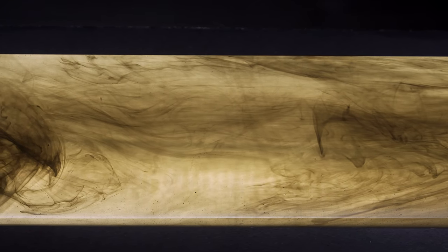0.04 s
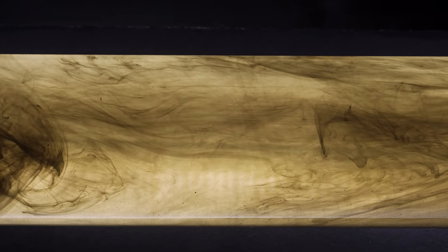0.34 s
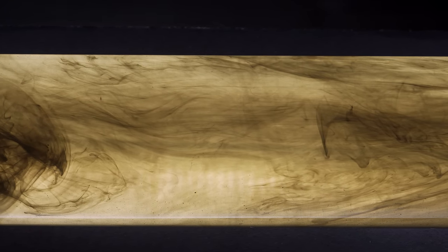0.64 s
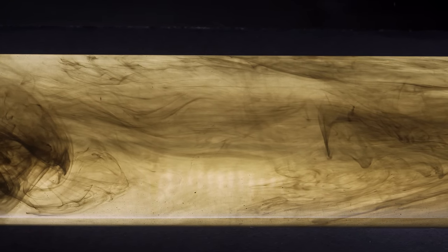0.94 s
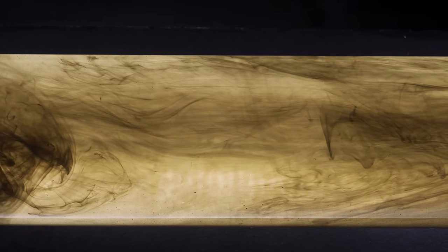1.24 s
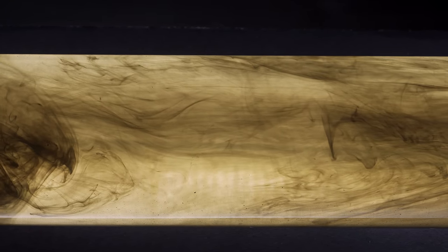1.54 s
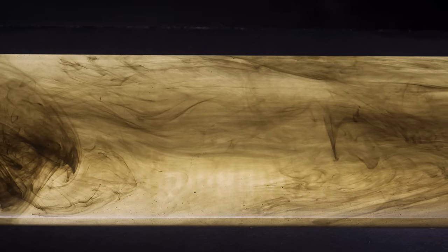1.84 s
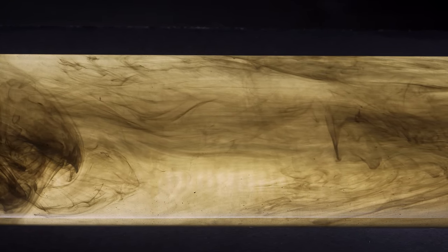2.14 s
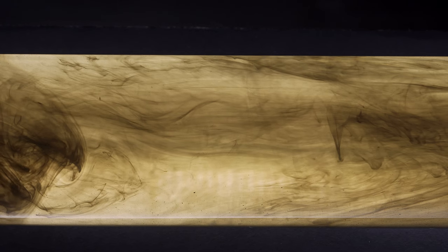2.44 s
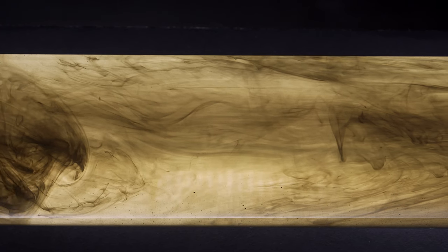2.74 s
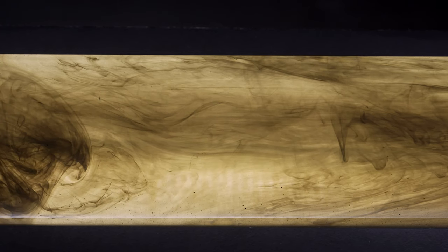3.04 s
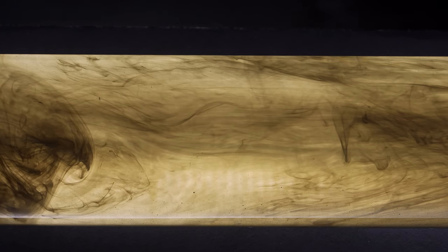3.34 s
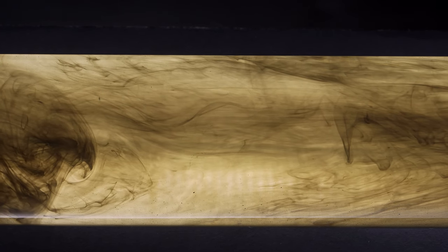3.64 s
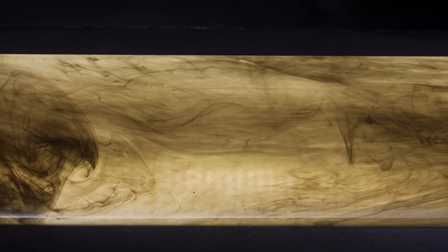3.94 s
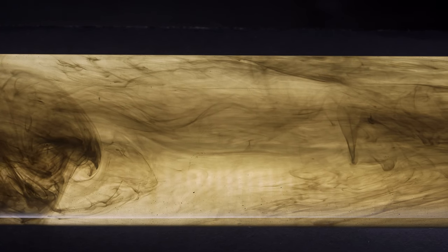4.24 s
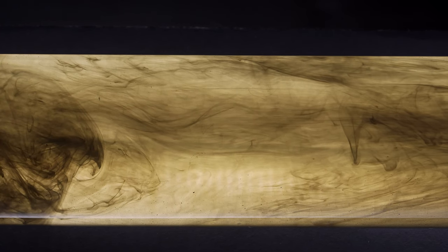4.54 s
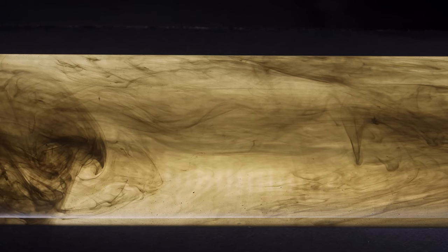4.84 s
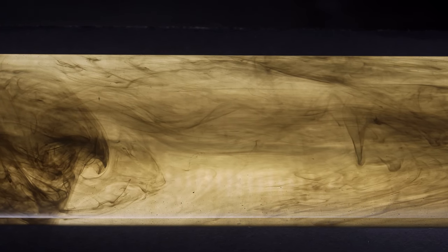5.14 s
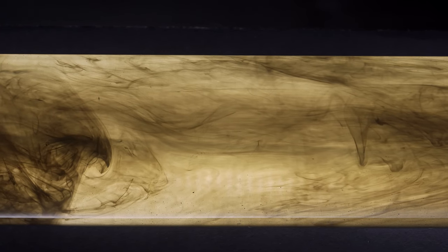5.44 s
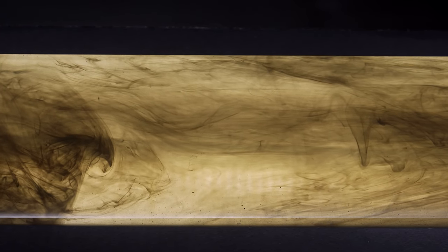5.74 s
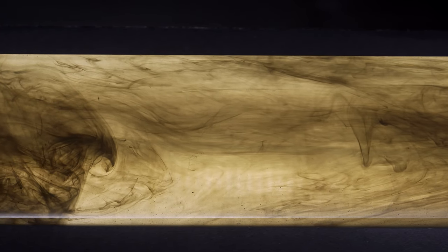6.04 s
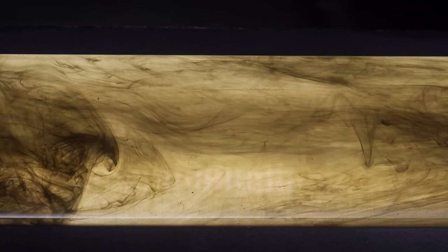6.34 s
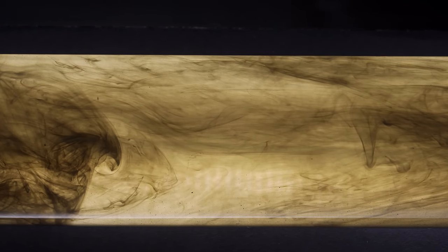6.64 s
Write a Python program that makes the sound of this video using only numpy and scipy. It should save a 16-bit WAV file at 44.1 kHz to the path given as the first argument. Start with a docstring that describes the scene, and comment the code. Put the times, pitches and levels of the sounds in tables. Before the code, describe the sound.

A small geared water pump runs steadily indoors, very close to the microphone. Its strokes come nearly ten times a second, knocking the housing and its stand into a low hum and a fast, even buzz. Each stroke brings short squirts of water through a valve and a loose rattle. Underneath, gears grind, the motor whines faintly and water rushes softly through hoses, unchanged throughout.

```python
"""A small geared water pump runs steadily, close to the microphone, indoors.
From the start the gears grind, the motor whines faintly and water rushes through the hoses.
In each crank turn, nearly ten a second, the push stroke squirts water through a valve, takes up
the slack and knocks the housing and its stand, and the loose drive rattles.
The return stroke follows with another squirt, another knock and a softer rattle."""
import sys
import numpy as np
from scipy import signal
from scipy.fft import rfft, irfft, next_fast_len
from scipy.io import wavfile
from scipy.ndimage import map_coordinates

SR = 44100
rng = np.random.default_rng(int(sys.argv[2]) if len(sys.argv) > 2 else 0)


def to_wav(sig):
    """Store sig (one row per channel, or 1-D mono) as 16-bit WAV at the path in sys.argv[1].

    Samples outside -1..1 are clipped; the rate is SR.
    """
    pcm = np.clip(np.atleast_2d(sig), -1, 1) * 32767
    pcm = np.round(pcm).astype(np.int16)
    wavfile.write(sys.argv[1], SR, pcm.T)  # frames by channels


N = 295470


def amp(db):
    """Decibels to gain."""
    return 10 ** (np.asarray(db) / 20)


def unit_rms(x):
    """x scaled to rms 1."""
    return x / np.sqrt(np.mean(x ** 2) + 1e-20)


def wobble(rate_hz):
    """Smooth random curve, rate_hz knots a second."""
    knots = rng.standard_normal(int(N * rate_hz / SR) + 4)
    return map_coordinates(knots, [np.arange(N) * rate_hz / SR])


def filtered(x, response):
    """x through a complex frequency response."""
    size = next_fast_len(len(x) + SR // 2)
    return irfft(rfft(x, size) * response(np.fft.rfftfreq(size, 1 / SR)), size)[:len(x)]


def coloured(x, spectrum):
    """x shaped by (freq_hz, gain_db) points on a log axis; rms 1."""
    freq_hz, gain_db = np.transpose(spectrum)
    response = lambda hz: amp(np.interp(np.log(hz + 1), np.log(freq_hz), gain_db, left=-60))
    return unit_rms(filtered(x, response))


def burst(rise_s, t60_s):
    """Envelope that swells and dies."""
    t = np.arange(SR // 4) / SR
    return (1 - np.exp(-(t / rise_s) ** 2)) * amp(-60 * t / t60_s)


def each_turn(turns, angle_turns, shape, scatter_db):
    """Plays shape whenever the crank passes the angle, at a slightly random strength."""
    passes = np.flatnonzero(np.diff(np.floor(turns - angle_turns)))
    impulses = np.zeros(len(turns))
    impulses[passes] = amp(scatter_db * rng.standard_normal(len(passes)))
    return signal.fftconvolve(impulses, shape)[SR:SR + N]


# Crank speed: time_s, turns_per_s
CRANK_SPEED = [(0, 9.7545), (4.2, 9.7545), (4.6, 9.748), (6.7, 9.748)]

def crank():
    """Crank angle in turns, from 1 s before the start: the pump is already running."""
    turns_per_s = np.interp(np.arange(-SR, N) / SR, *np.transpose(CRANK_SPEED))
    turns = np.cumsum(turns_per_s) / SR
    return turns - turns[SR]


def teeth(turns, repeat_db):
    """Rough contact: the same teeth meet every turn, with fresh noise on top."""
    turn_samples = round(SR / CRANK_SPEED[0][1])
    position = (turns[SR:] % 1 * turn_samples).astype(int)
    surface = rng.standard_normal(turn_samples)[position]
    return unit_rms(amp(repeat_db) * surface + rng.standard_normal(N))


# Pump chamber main resonances: centre_hz, width_hz, gain_db
CHAMBER_MODES = [(1540, 232, -3.5), (2158, 135, -6), (2477, 157, -7), (2850, 83, -3), (3147, 91, -7.2),
                 (3460, 220, -7), (3820, 135, -4), (4062, 138, -4), (4685, 560, -8), (4987, 150, -1.5),
                 (5264, 133, -4.5), (5697, 210, -5.5), (6072, 215, -6), (6600, 460, -8), (7940, 78, -5)]

def chamber(x, spectrum):
    """x through the chamber's main and evenly spaced high resonances, signs alternating; rms 1."""
    spacing_hz, width_hz, upper_db, loss_db_per_octave = 515, 173, -11, 6
    orders = np.arange(14, 31)
    upper_modes = [(k * spacing_hz, width_hz, upper_db - loss_db_per_octave * np.log2(k / orders[0]))
                   for k in orders]
    modes = sorted(CHAMBER_MODES + upper_modes)

    def response(hz):
        return sum((-1) ** k * amp(db) * 1j * hz * width / (centre ** 2 - hz ** 2 + 1j * hz * width)
                   for k, (centre, width, db) in enumerate(modes))
    return coloured(filtered(x, response), spectrum)


# Gear grinding spectrum: freq_hz, gain_db
GEAR_SPECTRUM = [(300, 32.5), (1400, -1.5), (2900, 0.5), (3600, 0), (5000, -8), (10000, -4.5), (15500, -29)]

def gears(turns, level_db, repeat_db, load_db):
    """The gears grind through the chamber, harder as the load peaks once a turn."""
    peak_turns = 0.8
    load = amp(load_db * np.cos(2 * np.pi * (turns[SR:] - peak_turns)))
    return amp(level_db) * chamber(load * teeth(turns, repeat_db), GEAR_SPECTRUM)


# Motor whine: pitch_hz, rms_db
MOTOR_TONES = [(1883, -85), (2799, -80.5), (2895, -84.5)]

def motor(waver_rad, ring_hz, width_hz, ring_db):
    """Thin, unsteady tones of the fast motor; its brushes keep the metal can ringing."""
    t = np.arange(N) / SR
    tones = sum(amp(db) * np.sqrt(2) * np.sin(2 * np.pi * hz * t + waver_rad * wobble(23))
                for hz, db in MOTOR_TONES)
    can = lambda hz: (1j * hz * width_hz / (ring_hz ** 2 - hz ** 2 + 1j * hz * width_hz)) ** 2
    return tones + amp(ring_db) * unit_rms(filtered(rng.standard_normal(N), can))


# Hose flow spectrum: freq_hz, gain_db
FLOW_SPECTRUM = [(25, -11), (58, 3), (110, 1), (250, 1.5), (380, 5.5), (520, 0.5), (660, 5.5), (800, -14),
                 (1150, -3), (1500, -23), (4000, -31)]

def hoses(level_db, swell_db):
    """Water rushes softly through the hoses, swelling a little."""
    return amp(level_db + swell_db * wobble(5.1)) * coloured(rng.standard_normal(N), FLOW_SPECTRUM)


# Valve squirts: angle_turns, rise_s, t60_s, gain_db
VALVE_SQUIRTS = [(0.395, 0.0056, 0.021, 1), (.57, 0.014, 0.02, -17), (0.742, 0.004, 0.016, 0.5),
                 (.88, 0.028, 0.15, -24)]
# Flaps hitting their seats: angle_turns, gain_db
FLAP_CLICKS = [(.433, -2.5), (.774, -8.5), (.812, -2)]
# Water jet tilt: freq_hz, gain_db
JET_SPECTRUM = [(1400, -8.5), (2900, -7.5), (4200, -2), (6300, -1.5), (8600, -3.5), (9600, 4), (10300, -2),
                (14000, -2), (15500, -5)]

def valves(turns, level_db, sputter_db, drift_db):
    """Turbulent squirts and flap clicks ring the chamber."""
    flow = sum(amp(db) * each_turn(turns, angle, burst(rise_s, t60_s), scatter_db=1.76)
               for angle, rise_s, t60_s, db in VALVE_SQUIRTS)
    flicker = amp(sputter_db * wobble(700) + drift_db * wobble(1.98))
    jet = flow * flicker * rng.standard_normal(N)
    clicks = sum(each_turn(turns, angle, amp([db]), scatter_db=3.0) for angle, db in FLAP_CLICKS)
    return amp(level_db) * chamber(jet + clicks, JET_SPECTRUM)


TAKE_UP_TURNS, PUSH_TURNS, RETURN_TURNS = 0.409, 0.436, 0.780
# Housing and stand modes: pitch_hz, t60_s, take_up_gain_db, push_gain_db, return_gain_db
HOUSING_MODES = [(49.3, 0.2, -39, -38, -38.5), (60.1, 0.14, -58, -29.5, -31), (114, 0.38, -68, -45, -54.5),
                 (145.16, 0.26, -48, -45, -49.5), (198, 0.78, -35.5, -36.5, -88),
                 (226.3, 0.22, -41, -42.5, -44.5), (256.1, 0.21, -81, -61, -45),
                 (237.77, 0.41, -78.5, -42.5, -45), (272.5, 0.3, -65, -38, -42.5),
                 (278.1, 0.29, -44.5, -42, -103), (353.4, 0.042, -42.5, -50, -38.5),
                 (341.7, 0.26, -87, -70, -51.5), (423.3, 0.35, -56.5, -37.5, -67),
                 (423.1, 0.27, -54.5, -38, -54.5), (477, 0.18, -51, -49.5, -60.5),
                 (529, 0.028, -36, -32, -49), (593, 0.99, -66.5, -56.5, -103),
                 (630.4, 0.3, -50, -90, -55.5), (673.3, 0.14, -75, -41, -50), (731, 0.2, -82, -73.5, -59),
                 (829.5, 0.062, -62.5, -56, -53), (972.4, 0.34, -71.5, -64, -78),
                 (1093, 0.13, -60, -63, -54.5), (1222, 0.075, -58, -68, -67), (1309, 0.15, -90, -63, -64.5)]

def knocks(turns, level_db, scatter_db):
    """Three blows a turn land at different spots and favour different modes; the ringing forms a hum."""
    t = np.arange(SR // 2) / SR
    pitch_hz, t60_s, *gains_db = np.transpose(HOUSING_MODES)
    sign = (-1) ** np.arange(len(pitch_hz))  # neighbouring modes swing in opposite directions
    decay = amp(-60 * t / t60_s[:, None])
    rings = sign[:, None] * np.sin(2 * np.pi * pitch_hz[:, None] * t) * decay
    blows = zip((TAKE_UP_TURNS, PUSH_TURNS, RETURN_TURNS), gains_db)
    ringing = sum(each_turn(turns, angle, amp(db) @ rings, scatter_db) for angle, db in blows)
    return -amp(level_db) * ringing


# Loose drive spectrum: freq_hz, gain_db
RATTLE_SPECTRUM = [(100, -7), (260, 2), (400, -2.5), (540, -2.5), (660, 7), (770, -8), (950, -5),
                   (1080, -1), (1200, 3), (1380, -14), (1530, -5), (1850, -25.5)]

def rattle(turns, level_db, return_db, rise_s, t60_s, repeat_db):
    """Play in the drive rattles at each load reversal."""
    envelope = burst(rise_s, t60_s)
    shake = each_turn(turns, TAKE_UP_TURNS, envelope, scatter_db=1.3)
    shake += amp(return_db) * each_turn(turns, RETURN_TURNS, envelope, scatter_db=0.8)
    return amp(level_db) * coloured(shake * teeth(turns, repeat_db), RATTLE_SPECTRUM)


def scene():
    """One crank times gears, valves, knocks and rattle, over motor whine and hose flow."""
    turns = crank()
    pump = gears(turns, level_db=-69.5, repeat_db=-1.5, load_db=2.5)
    pump += motor(waver_rad=0.27, ring_hz=2897, width_hz=200, ring_db=-76.5)
    pump += hoses(level_db=-68.5, swell_db=4.0)
    pump += valves(turns, level_db=-66.0, sputter_db=0.8, drift_db=0.5)
    pump += knocks(turns, level_db=-1.43, scatter_db=0.37)
    pump += rattle(turns, level_db=-63.5, return_db=-12, rise_s=0.0026, t60_s=0.41, repeat_db=-7)
    return pump[None]


def record(dry):
    """The microphone sheds the deepest bass and softens the top; nothing passes the band limit."""
    bass_hz, treble_hz, limit_hz = 30, 14500, 15750
    microphone = lambda hz: (1j * hz / (1j * hz + bass_hz)) ** 2 / np.sqrt(1 + (hz / treble_hz) ** 20)
    return filtered(dry[0], lambda hz: microphone(hz) * (hz < limit_hz))[None]


dry = scene()
out = record(dry)
to_wav(out)
```